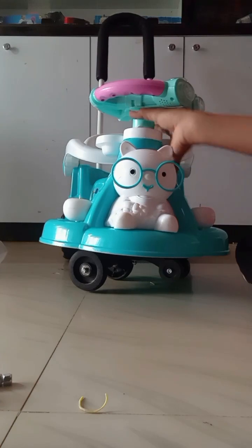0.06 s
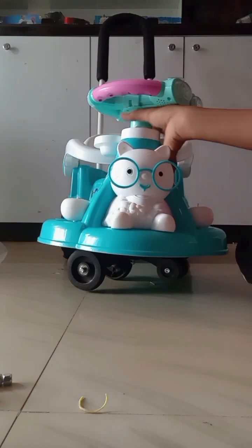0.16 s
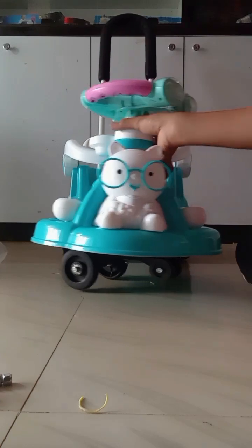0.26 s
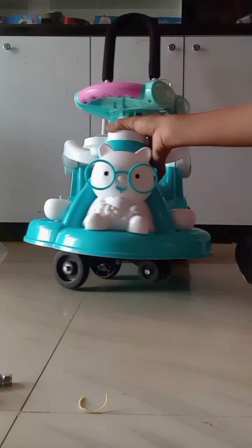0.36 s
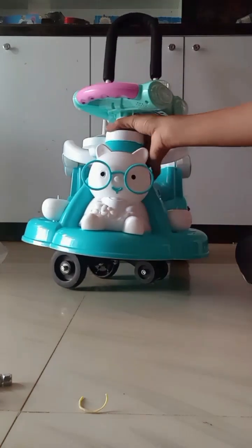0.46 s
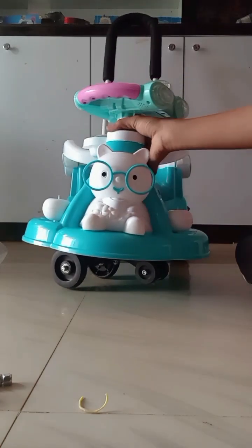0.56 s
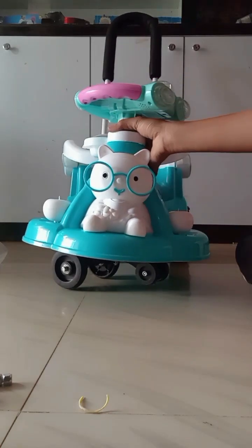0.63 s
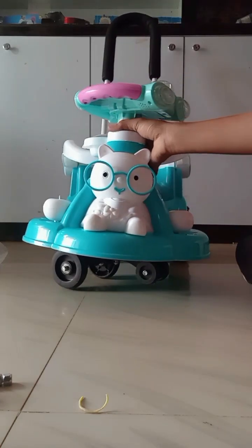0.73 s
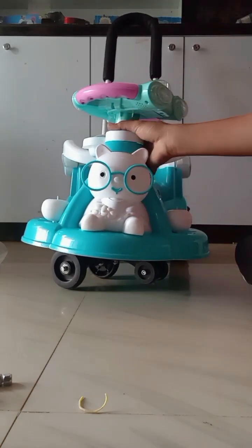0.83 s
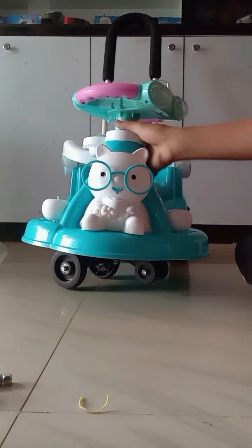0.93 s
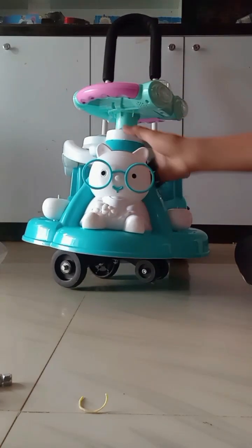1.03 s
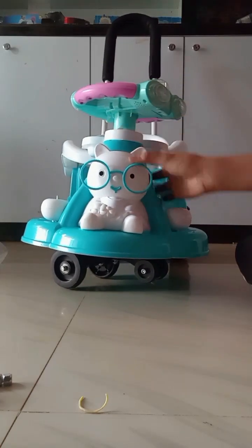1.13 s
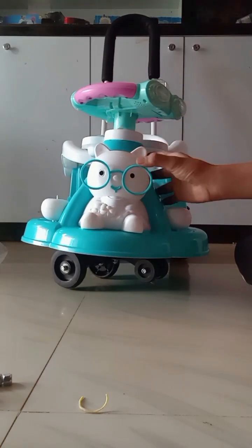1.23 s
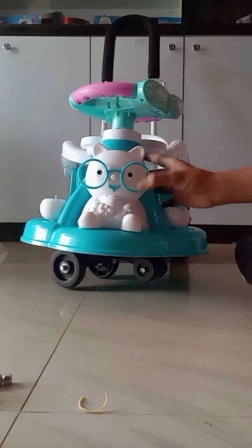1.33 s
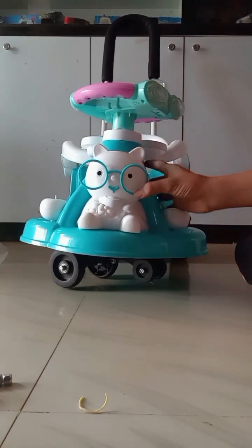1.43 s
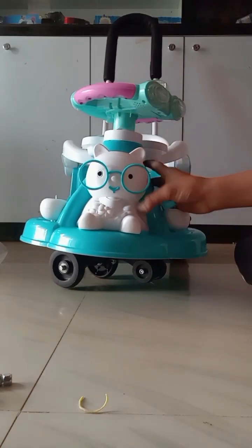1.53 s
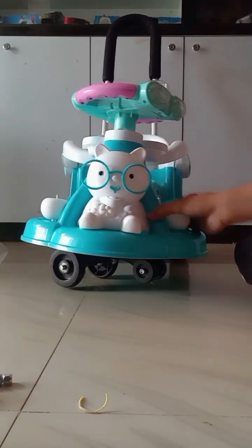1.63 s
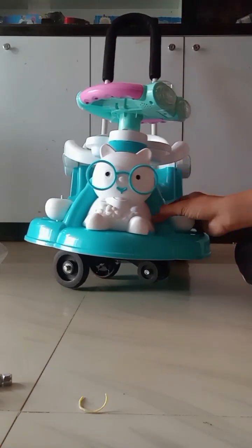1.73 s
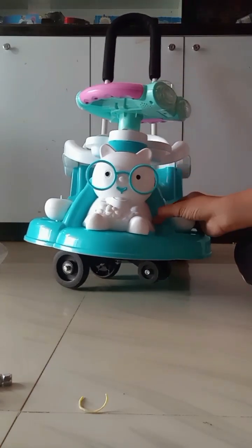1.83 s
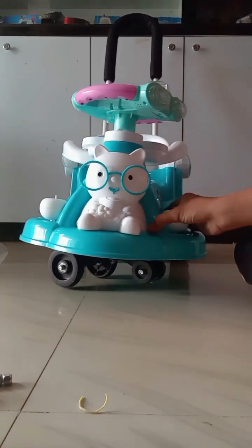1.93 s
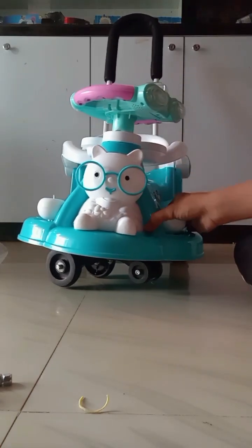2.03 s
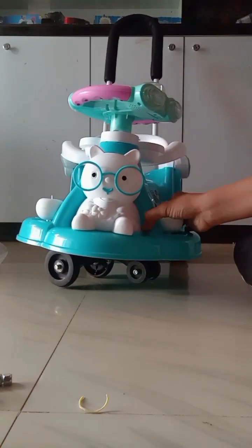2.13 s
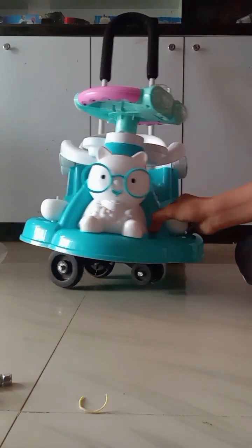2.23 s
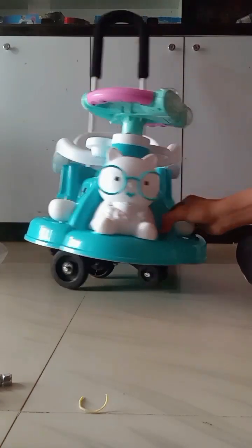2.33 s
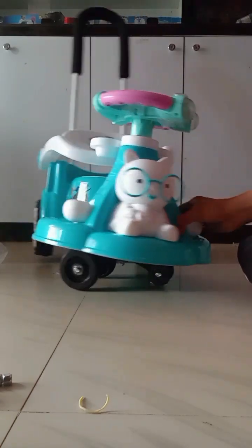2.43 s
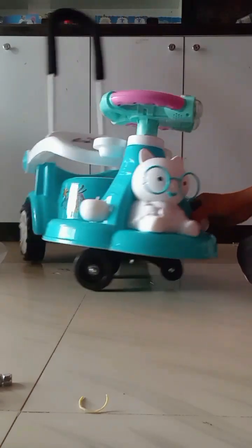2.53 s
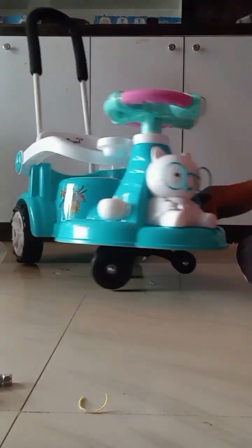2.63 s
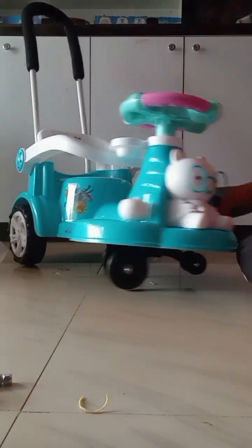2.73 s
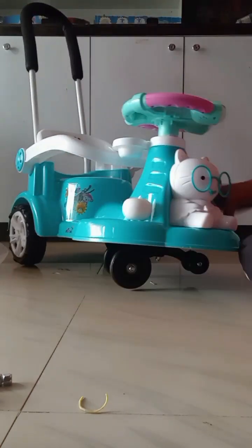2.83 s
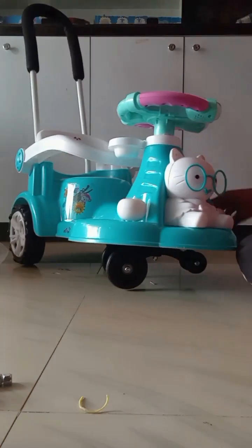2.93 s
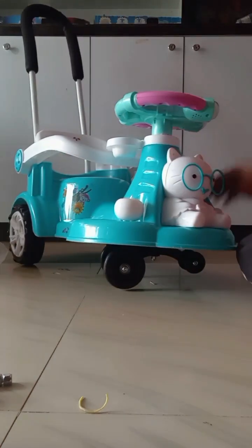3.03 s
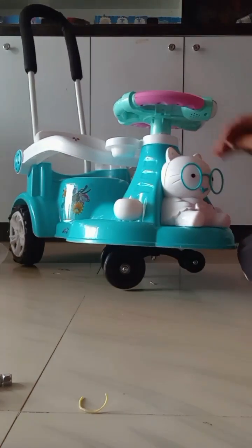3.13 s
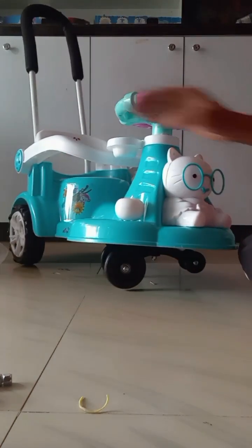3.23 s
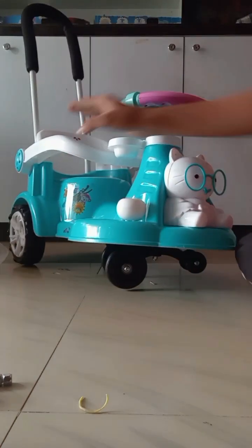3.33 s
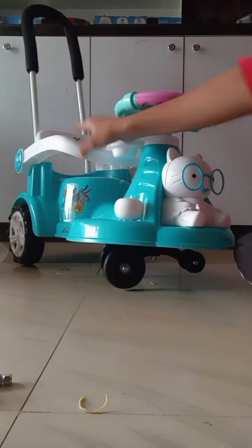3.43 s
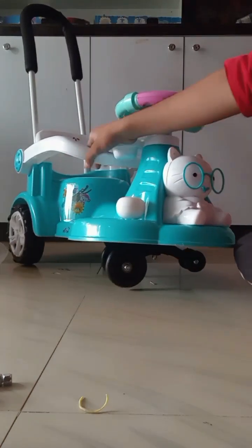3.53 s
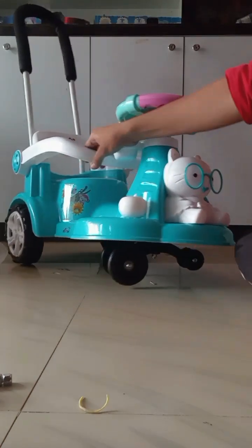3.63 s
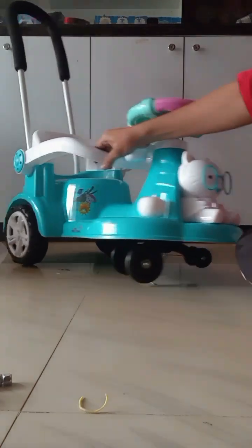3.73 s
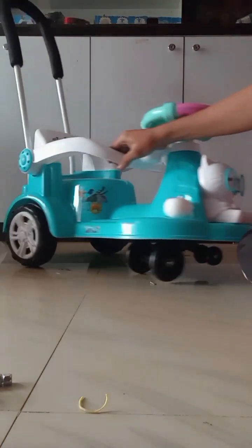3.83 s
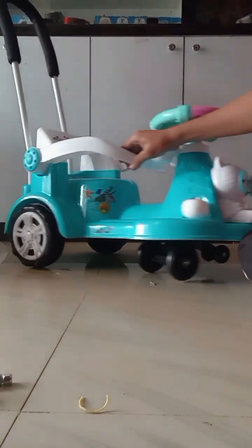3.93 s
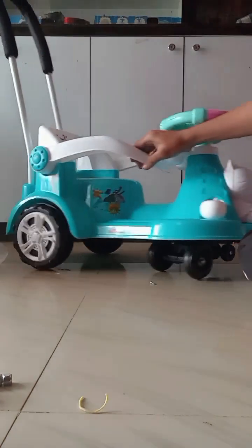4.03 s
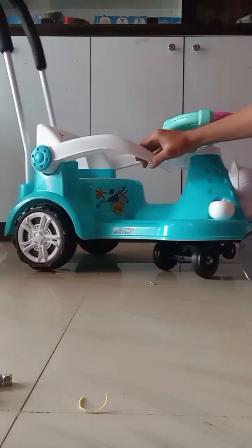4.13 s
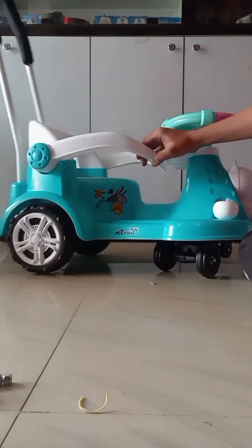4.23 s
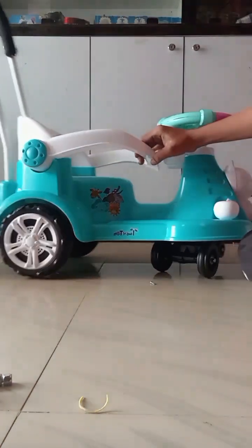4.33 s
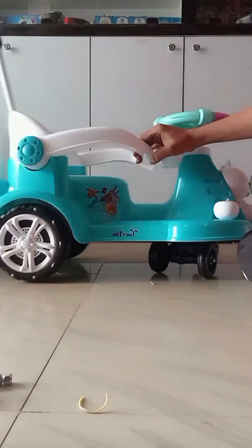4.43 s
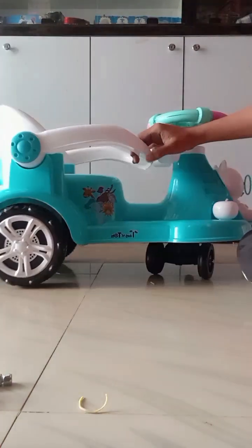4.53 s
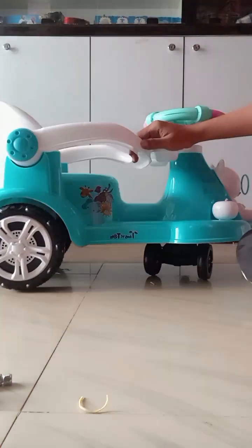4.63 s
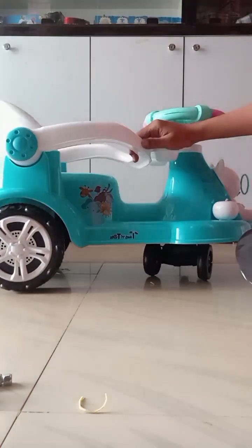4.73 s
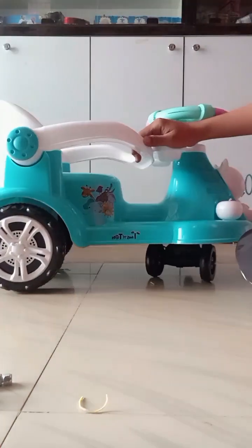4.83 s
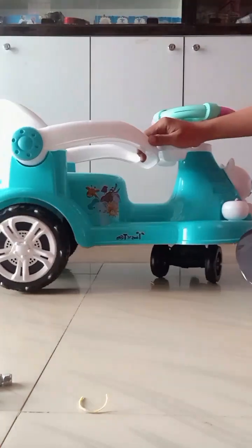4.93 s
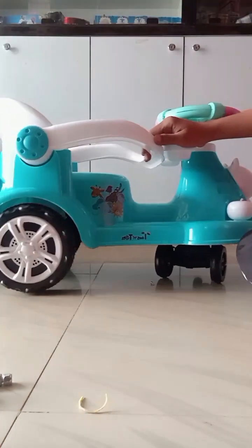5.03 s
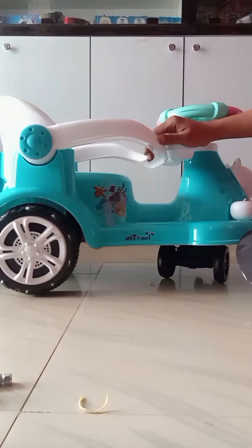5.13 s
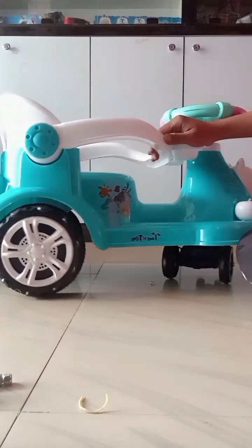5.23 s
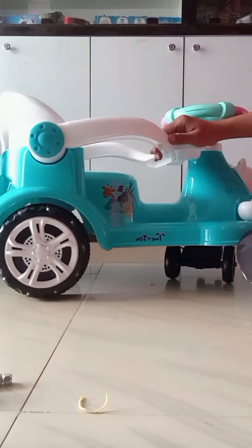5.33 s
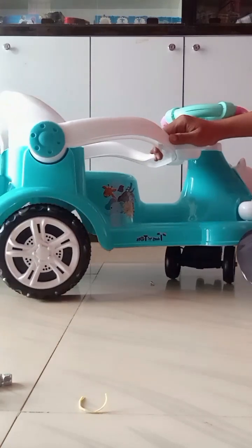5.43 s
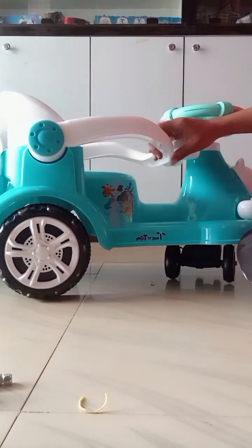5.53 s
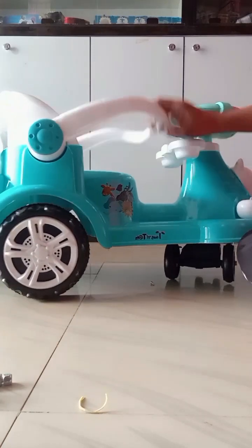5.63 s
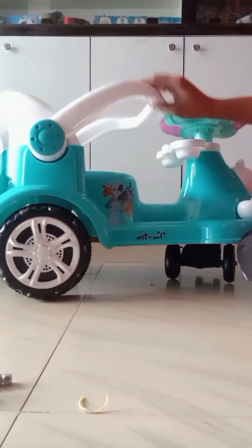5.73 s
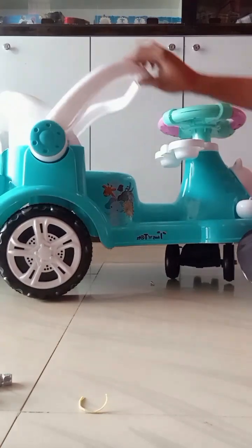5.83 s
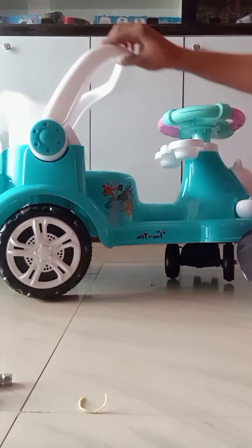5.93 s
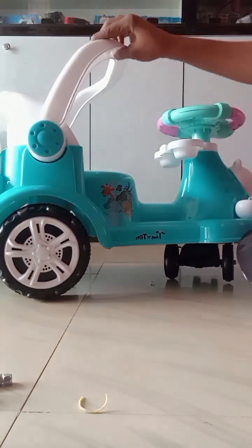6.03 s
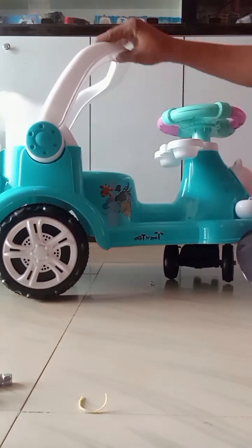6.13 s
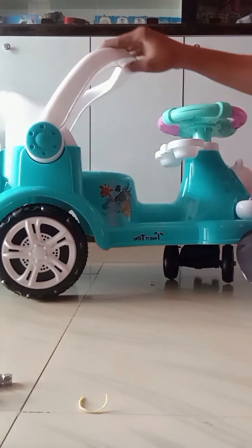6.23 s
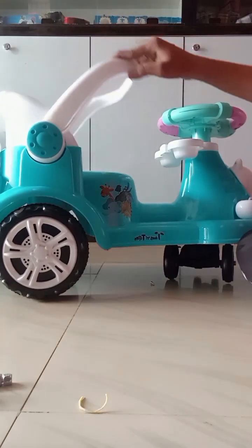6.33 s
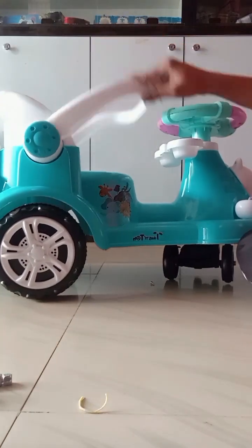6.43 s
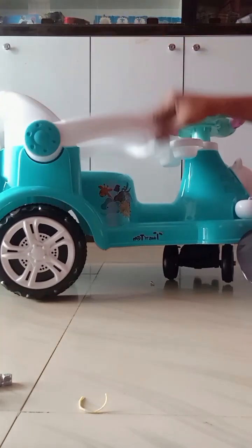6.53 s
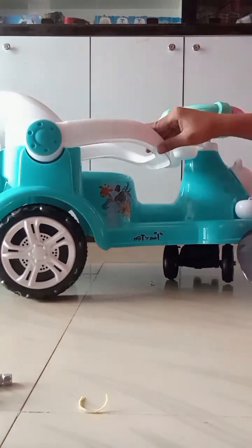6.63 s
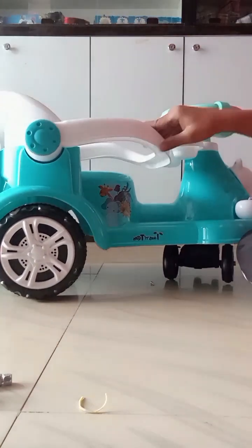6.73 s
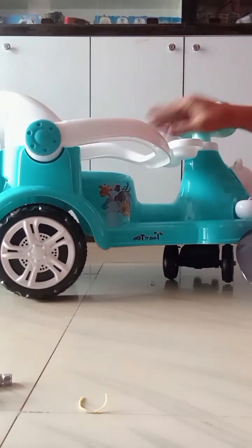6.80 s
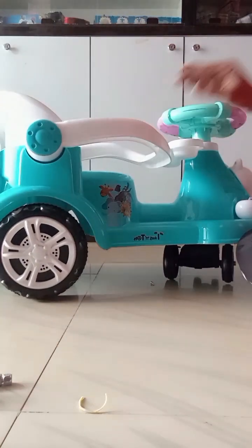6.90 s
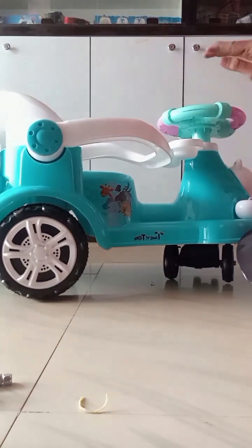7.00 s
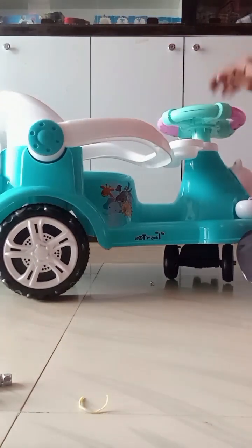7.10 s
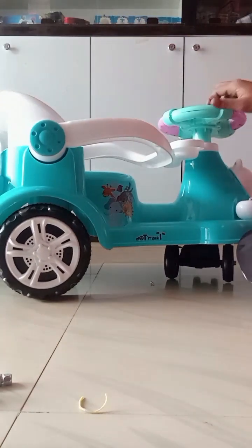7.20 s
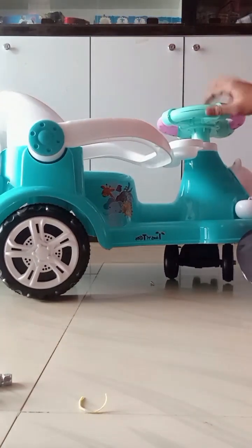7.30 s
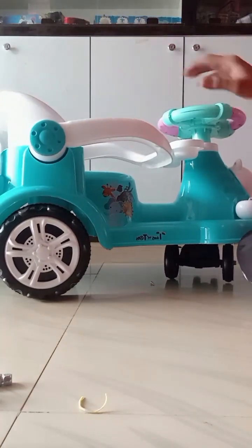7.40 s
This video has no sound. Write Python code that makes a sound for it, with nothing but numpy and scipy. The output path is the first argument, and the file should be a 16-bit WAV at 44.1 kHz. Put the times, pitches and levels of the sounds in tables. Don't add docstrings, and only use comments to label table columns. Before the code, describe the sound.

Street noise and faint horns fill a tiled room while small wheels roll, a hollow plastic body hums, and a lifted rail clacks down.

```python
import sys
import numpy as np
from scipy import signal
from scipy.io import wavfile
from scipy.ndimage import uniform_filter1d

SR = 44100
rng = np.random.default_rng(int(sys.argv[2]) if len(sys.argv) > 2 else 0)


def to_wav(sig):
    pcm = np.clip(np.atleast_2d(sig), -1, 1) * 32767
    pcm = np.round(pcm).astype(np.int16)
    wavfile.write(sys.argv[1], SR, pcm.T)


def magnitude_from_level(level_db):
    exponent = np.asarray(level_db, float) / 20
    return 10 ** exponent


N = 328986


def evened(x):
    return x / np.sqrt(np.mean(x ** 2) + 1e-20)


def add(mix, s, sound):
    part = mix[round(s * SR):][:len(sound)]
    part += sound[:len(part)]


def band(x, lo_hz, hi_hz):
    return signal.sosfilt(signal.butter(2, [lo_hz, hi_hz], "band", fs=SR, output="sos"), x)


def ring(x, hz, width_hz):
    r = np.exp(-np.pi * width_hz / SR)
    return signal.lfilter([1], [1, -2 * r * np.cos(2 * np.pi * hz / SR), r * r], x)


def humps(t, rows):
    middle, half, db = np.transpose(rows)[:3, :, None]
    return db * np.maximum(1 - abs(t - middle) / half, 0)


def coloured(x, db):
    log_gain = np.log(magnitude_from_level(np.r_[db, db[-2:0:-1]]))
    taps = np.fft.ifft(np.exp(np.conj(signal.hilbert(log_gain)))).real
    return signal.oaconvolve(x, taps[:2048])[:len(x)]


def echo(x, t60, wet_db, gap_ms):
    t = np.arange(round(t60 * SR)) / SR
    tail = rng.standard_normal(len(t)) * magnitude_from_level(-60 * t / t60) * (t > gap_ms / 1000)
    return x + magnitude_from_level(wet_db) * signal.fftconvolve(x, tail / np.linalg.norm(tail))[:N]


# pitch in Hz, width in Hz, lift in dB.
HOUSING_MODES = [(378, 197, 4.5), (704, 130, 5), (1200, 575, 18), (3010, 198, 14.5), (5880, 460, 20),
                 (8000, 76, 5.5), (9300, 260, 3), (12600, 160, 7), (14600, 700, 2)]


def housing_db(hz):
    return sum(db / (1 + (2 * (hz - f) / width) ** 2) for f, width, db in HOUSING_MODES)


# frequency in Hz, level in dB per Hz.
WINDOW_SLOPE = [(20, -53), (35, -63), (70, -28), (150, -41.5), (450, -54), (1500, -58), (2600, -68),
                (4200, -78), (5100, -93), (7650, -93.5), (7950, -84.5), (10000, -91), (11000, -95.5),
                (15500, -100)]


def colour_db(hz):
    f, db = np.transpose(WINDOW_SLOPE)
    return np.interp(np.log(hz + 1), np.log(f), db) + housing_db(hz)


# time in seconds, street level in dB.
STREET_LEVEL = [(0, -34), (.4, -33.5), (1.2, -32.5), (2.1, -32.5), (3.3, -32), (4.0, -35.5), (4.4, -35),
                (4.7, -38), (5.2, -39.5), (5.6, -38.5), (6.4, -39.5), (7.46, -40)]
# middle in seconds, half length in seconds, lift in dB, dullness 0-1.
WHEEL_ROLLS = [(0.265, 0.18, -5, 0.8), (1.757, .3, 7.5, 0.8), (2.1, 0.23, -1, 0), (2.381, 0.19, 6, .55),
               (2.613, 0.22, 8, 0.6), (2.85, 0.32, 12, 0.49), (3.001, 0.18, 4, 0.9), (3.358, 0.13, 5.5, 1),
               (3.981, 0.083, 10, .9), (4.504, 0.44, 6.5, .9), (4.945, 0.25, 5, 0.6), (5.397, .15, -0.5, 1),
               (6.566, .16, 6.5, 0)]
# middle in seconds, half length in seconds, lift in dB.
AIR_THUMPS = [(0, 0.042, 11), (0.787, 0.14, 5), (1.134, .1, 6), (1.316, 0.11, 18.5), (1.904, .2, 3),
              (2.309, .2, 5), (2.986, .2, 0.5), (3.719, 0.22, 9), (3.999, 0.13, 15.5), (4.936, 0.17, 10.5),
              (5.21, 0.09, 3.5), (5.391, .1, 10), (6.372, 0.22, 13), (6.54, .2, 16.5), (7.154, 0.15, 7),
              (7.374, 0.17, 15)]


def roar():
    frames, hz = N // 256 + 5, np.fft.rfftfreq(1024, 1 / SR)
    t = np.arange(frames) * 256 / SR
    real, imaginary, patches = rng.standard_normal((frames, 513, 3)).T
    patches = uniform_filter1d(patches, size=14, axis=0)
    patches = evened(uniform_filter1d(patches, size=10, axis=1))
    flicker = evened(uniform_filter1d(rng.standard_normal(frames), size=5))

    street = np.interp(t, *np.transpose(STREET_LEVEL)) + 33
    rolls, dull = humps(t, WHEEL_ROLLS), np.transpose(WHEEL_ROLLS)[3]
    boom = -3 + 1.34 * street + humps(t, AIR_THUMPS).sum(0)
    rumble = 2.4 + 0.62 * street + dull @ rolls
    body = street + (1 - dull) @ rolls
    hiss = 2 + 0.94 * street + 0.11 * (body - street)

    centres = np.log([70, 280, 1100, 7000])
    share = np.array([np.interp(np.log(hz + 1), centres, row) for row in np.eye(4)])
    swell = share.T @ np.array([boom, rumble, body, hiss])
    level_db = colour_db(hz)[:, None] + swell + 1.57 * patches + 1.02 * flicker
    spectra = (real + 1j * imaginary) * magnitude_from_level(level_db)
    return magnitude_from_level(-27) * evened(signal.istft(spectra, nperseg=1024, noverlap=768)[1][:N])


# time in seconds, pitch in Hz, level in dB.
ENGINE_DRONE = [(0, 117.6, -16.5), (.55, 117.5, -23.5), (.96, 118, -25.5), (1.08, 117.5, -14.5),
                (1.519, 118.6, -12), (1.9, 119.8, -15), (2.6, 117.6, -16), (2.95, 117.6, -14),
                (3.8, 115.7, -9.5), (4.05, 114.8, -17), (4.409, 116.6, -16.5), (4.74, 115.1, -22.5),
                (5.65, 115.5, -27), (5.83, 115.3, -17.5), (6.2, 114.5, -30.5), (6.5, 118.5, -22),
                (6.85, 117.4, -29.5), (7.46, 118, -53)]
# time in seconds, level in dB.
ENGINE_OCTAVE = [(0, -45.5), (1.7, -54), (2.0, -26), (2.8, -27), (3.1, -51.5), (7.46, -43.5)]
# middle in seconds, half length in seconds,
# depth in dB.
WALL_FADES = [(0.128, .05, 8), (0.458, 0.056, 21), (0.588, 0.016, 15), (.68, 0.09, 2), (0.776, 0.054, 10),
              (0.92, 0.094, 7), (1.143, 0.048, 8), (1.78, 0.095, 5.5), (1.965, 0.023, 2),
              (2.216, 0.07, 3.5), (2.396, .1, 5), (2.723, .022, 20), (2.833, .11, 12.5), (3.262, 0.11, 9),
              (3.371, 0.023, 10), (3.584, 0.069, 8), (3.874, 0.057, 5.5), (4.04, 0.079, 5),
              (4.26, 0.075, 14), (4.562, 0.13, 12.5), (5.197, 0.1, 6), (5.394, 0.067, 14),
              (5.614, 0.042, 12), (5.708, 0.058, 10), (6.556, 0.031, 14), (6.708, 0.12, 15),
              (7.2, 0.047, 16)]


def drone():
    s, hz, db = np.transpose(ENGINE_DRONE)
    t = np.arange(N) / SR
    wobble = evened(band(rng.standard_normal(N), 0.85, 36))
    turns = 2 * np.pi * np.cumsum(np.interp(t, s, hz)) / SR
    first_db = np.interp(t, s, db) - humps(t, WALL_FADES).sum(0)
    first = magnitude_from_level(first_db) * (1 + 0.11 * wobble) * np.cos(turns)
    octave_db = np.interp(t, *np.transpose(ENGINE_OCTAVE)) - 7.5
    return first + magnitude_from_level(octave_db) * np.sin(2 * turns)


# start in seconds,
# length in seconds, comb level in dB, disc rasp level in dB.
HORN_BLASTS = [
    ((407, 3760), [(.045, .145, -45.5, -58)]),
    ((340, 3950), [(.21, 0.13, -59, -64)]),
    ((414.8, 3280), [(1.397, 0.21, -38, -35), (1.663, 0.28, -41.5, -37)]),
    ((408.5, 3260), [(2.003, .156, -50.5, -46)]),
]
# pitch in Hz, width in Hz, level in dB.
DISC_MODES = [(2787, 56, 2.5), (2960, 120, 1.5), (3060, 82, -10), (3174, 90, -1.5), (3335, 120, 4.5),
              (14500, 900, -32)]


def horn_blast(hz, disc_hz, length, db, rasp_db):
    t = np.arange(round(length * SR)) / SR
    drift, chatter = rng.standard_normal((2, len(t)))
    wander = 0.17 * uniform_filter1d(drift, size=500)
    scoop = 0.026 * np.exp(-t / 0.0235)
    turns = 2 * np.pi * np.cumsum(hz * (1 + wander - scoop)) / SR

    k = np.arange(5, 30)[:, None]
    disc_db = -11 * np.minimum(abs(k * hz - disc_hz) / 520, 2.5) ** 1.7
    upper_db = -33 - 3 * abs(k * hz - 9200) / 1000
    fading_db = 5.5 * np.sin(2 * np.pi * (rng.uniform(7, 18, k.shape) * t + rng.random(k.shape)))
    comb = ((magnitude_from_level(disc_db) + magnitude_from_level(upper_db)) * magnitude_from_level(fading_db) * np.cos(k * turns)).sum(0)

    rasp = np.zeros(len(t))
    for f, width, level in DISC_MODES:
        own_chatter = np.roll(chatter, round(f))
        rasp += magnitude_from_level(level) * evened(ring(ring(own_chatter, f, width), f, width))
    buzz = magnitude_from_level(db) * evened(comb) + magnitude_from_level(rasp_db) * evened(rasp)
    return buzz * magnitude_from_level(-15 * t) * signal.windows.tukey(len(t), 0.12)


def horns():
    out = np.zeros(N)
    for (hz, disc_hz), blasts in HORN_BLASTS:
        for start, length, db, rasp_db in blasts:
            add(out, start, horn_blast(hz, disc_hz, length, db, rasp_db))
    return echo(out, 0.35, -0.16, 22)


def ticks():
    out, t = np.zeros(N), np.arange(400) / SR
    trill = [(5.2, 2.2, 11)]
    for s in np.arange(0.0545, N / SR, 0.0721):
        late, size = rng.standard_normal(2)
        tick = band(rng.standard_normal(400) * np.exp(-t / 0.0025), 13500, 15400)
        tick_db = -73 + humps(s, trill).sum() + 2.5 * size
        add(out, s + 0.004 * late, magnitude_from_level(tick_db) * tick / abs(tick).max())
    whirr = evened(ring(rng.standard_normal(N), 9200, 90))
    whirr_db = -89.5 + 1.1 * humps(np.arange(N) / SR, trill).sum(0)
    return out + magnitude_from_level(whirr_db) * whirr


# middle in seconds, half length in seconds, level in dB,
# pitch in Hz.
BODY_SINGING = [
    (1.55, 0.28, -37, 405),
    (2.052, 0.3, -39, 410),
    (2.45, 0.42, -40, 710),
    (3.1, 0.48, -36, 693),
    (3.751, .3, -42.5, 563),
    (2.5, 0.37, -36, 1050),
    (3.748, 0.28, -42, 1440),
]


def singing():
    out, t = np.zeros(N), np.arange(N) / SR
    for middle, half, db, hz in BODY_SINGING:
        swell = humps(t, [(middle, half, 1)])[0]
        out += magnitude_from_level(db) * swell * evened(ring(rng.standard_normal(N), hz, 0.078 * hz))
    return out


# start in seconds, peak in dB, pitch in Hz, ring in ms.
DULL_BUMPS = [(2.691, -24, 305, 31), (3.501, -14.5, 235, 11), (3.72, -27, 390, 19), (3.959, -23, 368, 39),
              (7.346, -24, 253, 37), (3.649, -17.5, 245.5, 8.7), (3.808, -23.5, 194, 53),
              (3.945, -18.5, 255, 13), (3.985, -8.5, 135, 12), (4.421, -19, 230, 15),
              (4.53, -16.5, 269, 14), (5.124, -29, 309, 33), (5.398, -10, 128, 6.8), (6.3, -26.5, 154, 49),
              (2.956, -17, 630, 14), (6.662, -19, 330, 12), (6.671, -14.5, 303, 20),
              (6.697, -19.5, 293, 14), (6.668, -24.5, 560, 22), (4.4, -27, 221, 44), (4.5, -22.5, 242, 43),
              (7.154, -24, 132, 29), (7.345, -10, 145, 16), (7.435, -21.5, 128, 20)]


def bumps():
    out, t = np.zeros(N), np.arange(4096) / SR
    for s, db, hz, ring_ms in DULL_BUMPS:
        u = t * 4000 / ring_ms
        push = u * np.exp(1 - u)
        add(out, s, magnitude_from_level(db) * push * -np.sin(2 * np.pi * hz * t * (1 - 2.2 * t)))
    return out


# start in seconds, crack in dB, shell in dB over the crack,
# hardness in dB an octave, shell pitch in Hz.
PLASTIC_KNOCKS = [(2.6877, -23, 3, -2.5, 1200), (2.696, -23.5, 14, -6.5, 964), (2.7015, -20, 1, -4, 947),
                  (2.9551, -19.5, 16, -1.5, 1188), (2.954, -34, 13, -7, 2270), (3.9803, -48, 7, 12, 1200),
                  (6.647, -47.5, 11.5, -6, 3300), (6.673, -39, 15.5, -3, 1620),
                  (4.9354, -24.5, 4, -10, 1233), (5.667, -36.5, 5, 2.5, 1150),
                  (5.72, -26.5, -1, -9.5, 1200), (5.7263, -25.5, 8, -2.5, 1306),
                  (6.6478, -23.5, 4, -3, 1236), (6.6618, -32, 18.5, -2.5, 1150),
                  (6.67, -31.5, 18, -5, 1056), (6.6794, -32.5, 10.5, -5, 1350), (6.692, -47, 25.5, 3, 1000),
                  (7.252, -27, 4, -6, 1200), (7.3043, -42, 20.5, -7, 1023), (7.3945, -43, 14.5, 3.5, 1210)]
# start in seconds, crack in dB, shell in dB over the crack,
# hardness in dB an octave, shell pitch in Hz.
SOFT_SCUFFS = [(0.074, -30, 1.1, -6.5, 1370), (1.1082, -32.5, 13.4, -12, 1128),
               (2.0989, -37, 12, -10, 1416), (2.7199, -31, 10.6, -2, 1427), (2.974, -41, 4.6, 4, 1230),
               (3.2977, -44, 16, -6, 1050), (4.3894, -38, 9.9, -15, 1170), (4.52, -34.5, 5.6, -3, 970),
               (5.5874, -33.5, 2.1, -11, 1260), (5.7388, -33.5, 7, -4, 1170), (6.04, -42, 15, -7, 1310),
               (6.5095, -49, 20, -13, 1290), (7.187, -40, 5.7, -4, 1103), (7.2682, -33.5, 8.3, -4, 1150)]


def plastic_blow(shell_db, hardness, shell_hz, rattle_ms):
    t, hz = np.arange(4096) / SR, np.fft.rfftfreq(4096, 1 / SR)
    grit = rng.standard_normal(4096) * magnitude_from_level(2.6 * rng.exponential(1, 4096).clip(0, 4))
    u = t * 1000 / rattle_ms
    fall = np.exp(-2.6 * u) + 0.28 * np.exp(-0.7 * u)
    blow = grit * fall * np.minimum(u / 0.23, 1)

    crack_db = colour_db(np.maximum(hz, 1800)) - 0.43 * housing_db(np.minimum(hz, 4500)) + 70
    crack_db += hardness * np.log2(hz / 2000 + 0.5)
    crack_db += 3.2 * np.clip(hz / 4000 - 2.6, -0.4, 1)
    crack = band(coloured(blow, crack_db), 1740, 18000)

    v = t * 1000 / 1.68
    turns = 2 * np.pi * (shell_hz * t + rng.random((3, 1)))
    modes = np.sin(turns[0]) + 0.29 * np.sin(0.594 * turns[1])
    modes += 0.11 * np.sin(1.93 * turns[2]) * np.exp(-0.15 * v)
    rattle = band(ring(blow, shell_hz, 300), 450, 2300)
    shell = v ** 2 * np.exp(-v) * modes + 0.41 * rattle / abs(rattle).max()
    return crack / abs(crack).max() + magnitude_from_level(shell_db) * shell / abs(shell).max()


def knocks():
    out = np.zeros(N)
    for rows, rattle_ms in [(PLASTIC_KNOCKS, 9.7), (SOFT_SCUFFS, 20)]:
        for s, db, shell_db, hardness, shell_hz in rows:
            add(out, s, magnitude_from_level(db + 3) * plastic_blow(shell_db, hardness, shell_hz, rattle_ms))
    return echo(out, 0.13, -8, 2.1)


def scene():
    return (roar() + drone() + horns() + ticks() + singing() + bumps() + knocks())[None]


def low_pass(x):
    return signal.sosfilt(signal.butter(12, 16850, fs=SR, output="sos"), x)


def record(dry):
    bass_cut = signal.butter(3, 54.6, "high", fs=SR, output="sos")
    limit = 1.1
    held = limit * np.tanh(signal.sosfilt(bass_cut, dry) / limit)
    edge = signal.firwin(801, 15550, window=("kaiser", 9), fs=SR)
    return low_pass(signal.oaconvolve(held, edge[None], "same"))


dry = scene()
out = record(dry)
to_wav(out)
```